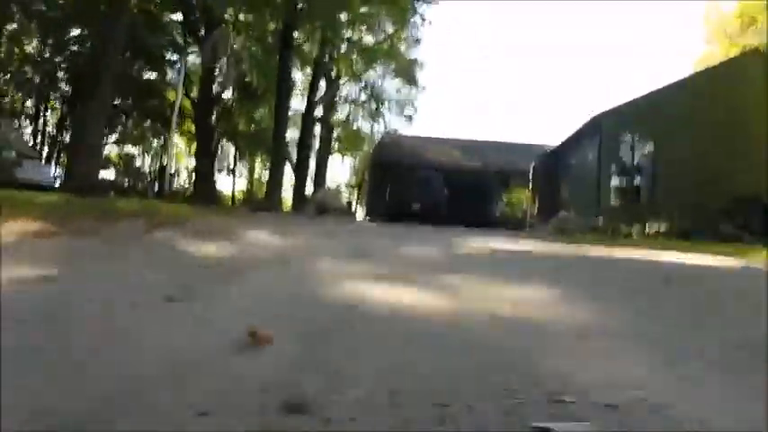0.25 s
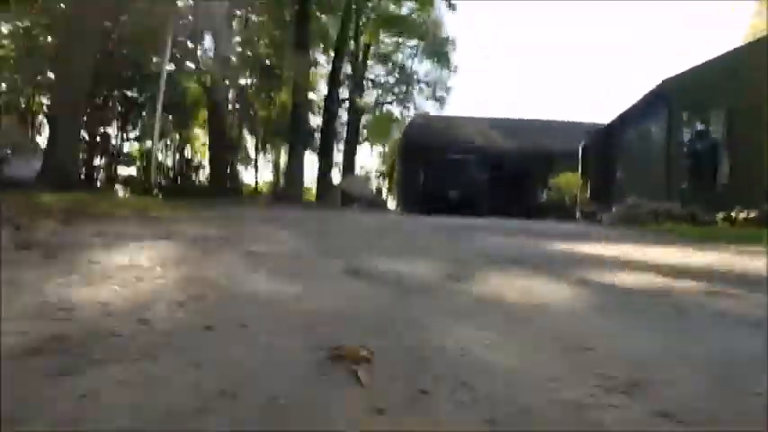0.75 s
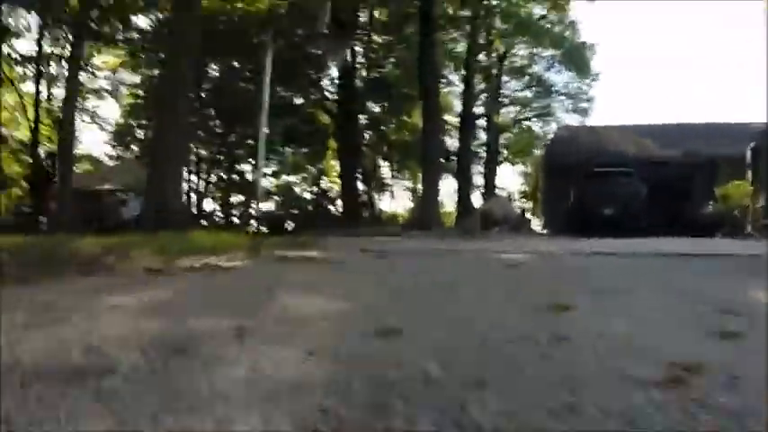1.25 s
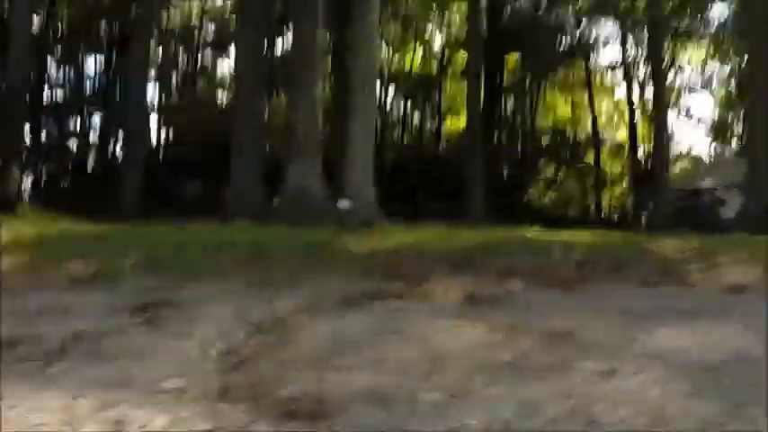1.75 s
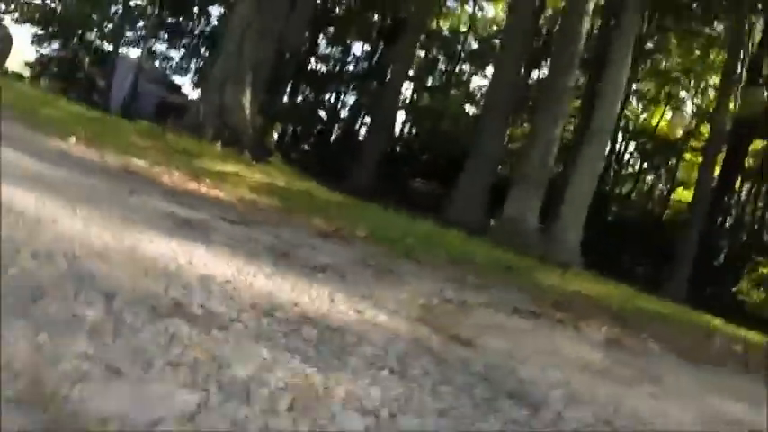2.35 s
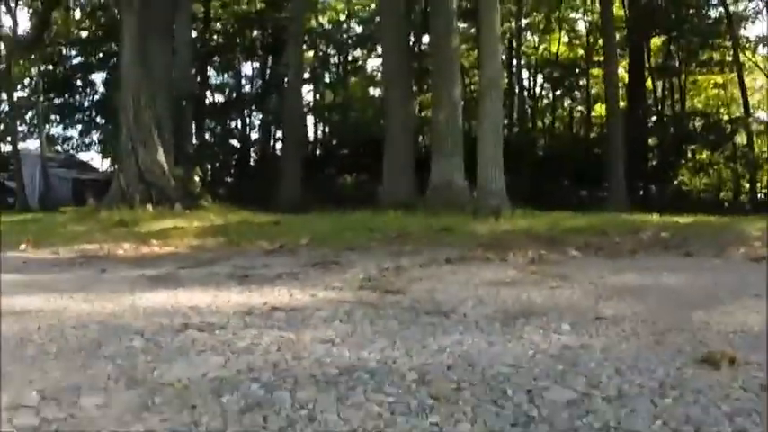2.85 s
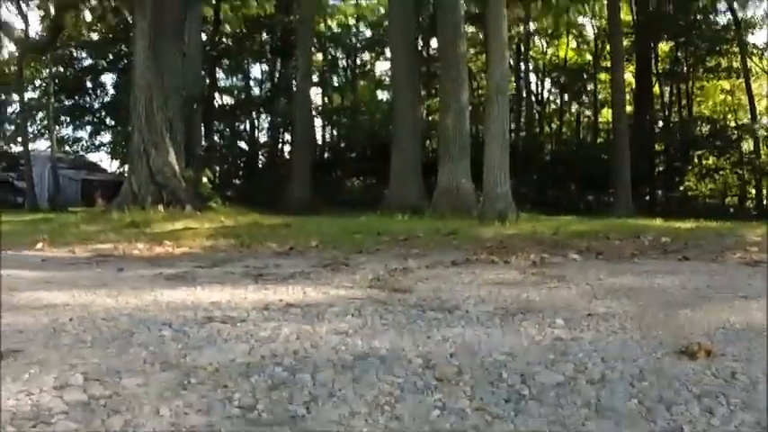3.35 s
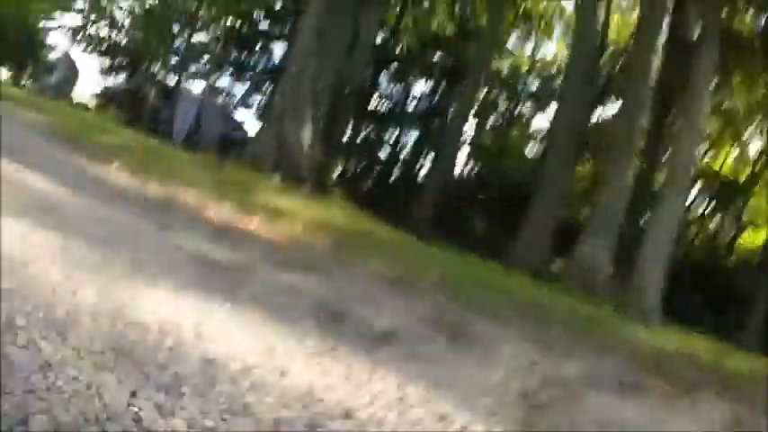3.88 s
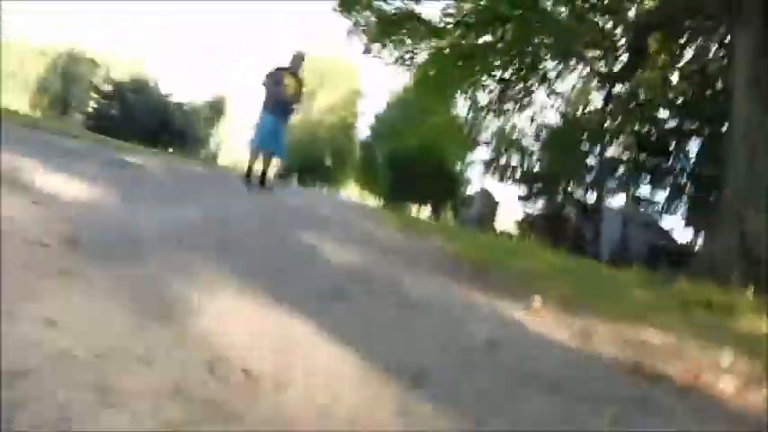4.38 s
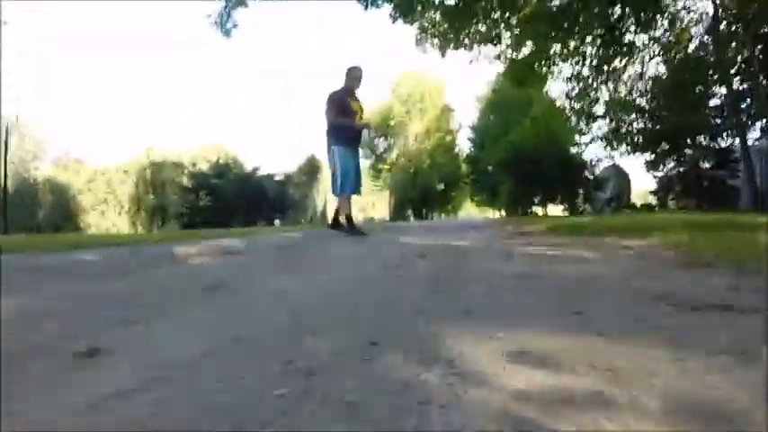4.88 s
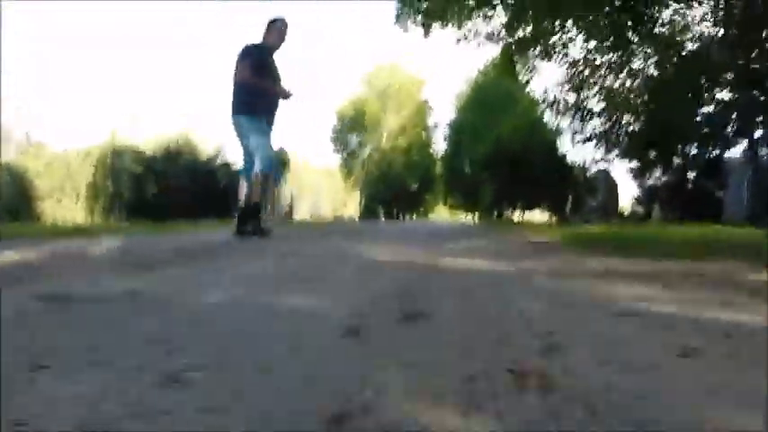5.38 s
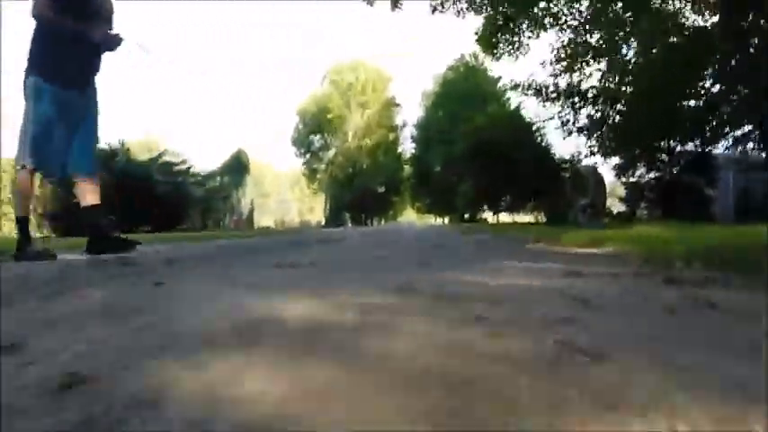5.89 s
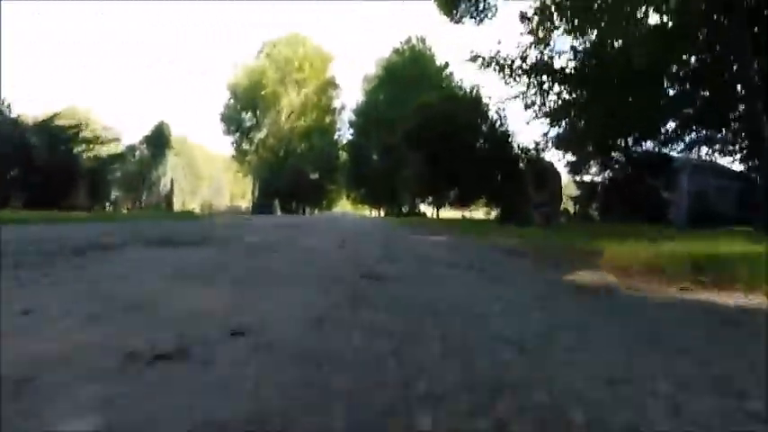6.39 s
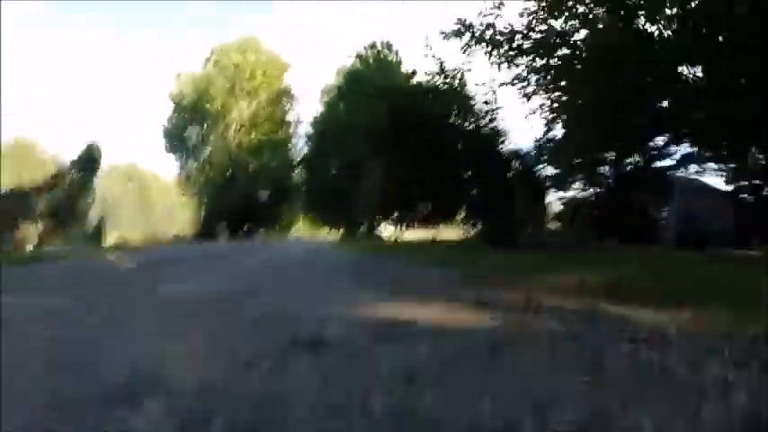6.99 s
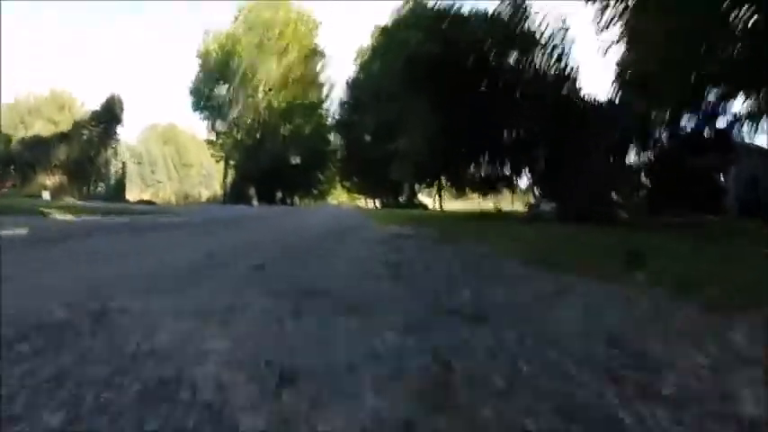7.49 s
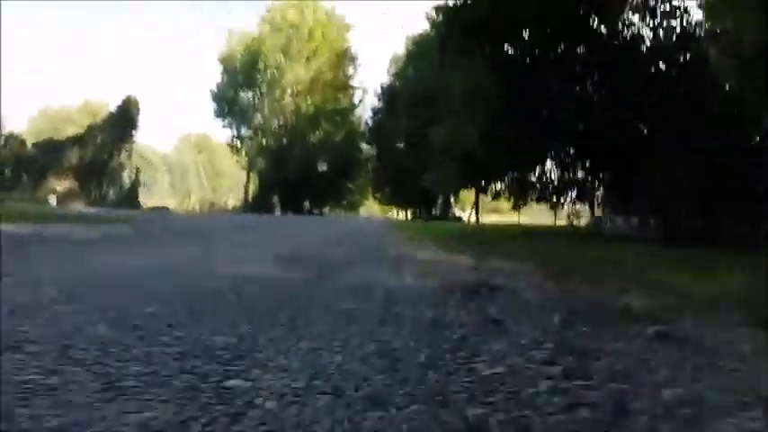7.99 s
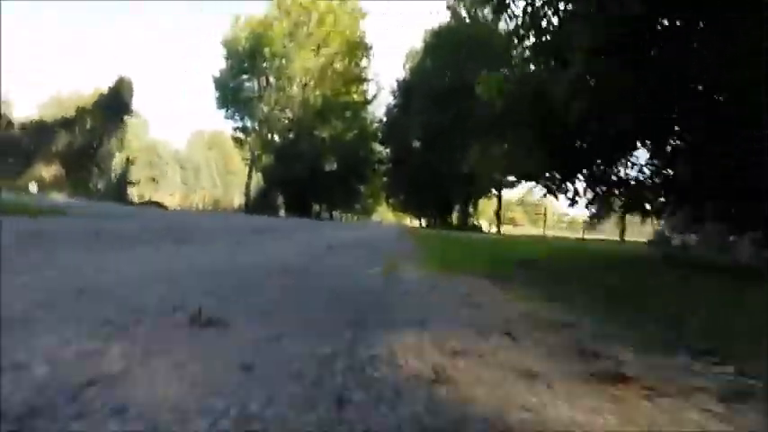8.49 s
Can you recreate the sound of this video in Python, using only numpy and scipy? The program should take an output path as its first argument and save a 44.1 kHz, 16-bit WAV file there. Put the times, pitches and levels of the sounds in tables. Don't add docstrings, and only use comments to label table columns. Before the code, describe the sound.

The microphone rides on a toy tractor, so everything is close, boxy and slightly squeezed on loud jolts. From 0 s the chassis rumbles and rattles over gravel; a dry leaf crunches near 0.2 s, with a heavy thump at 0.25 s and hollow panel knocks. Grit skids from about 0.7 to 1.9 s, with sharp ticks, thumps and plastic clacks. Around 2.3-2.8 s short gear groans interrupt a weaker rattle; from 2.9 to 3.4 s it is nearly still. A strong thump at 3.45 s and straining groans lead into a fuzzy motor hum rising at 3.6-3.8 s. It drives on from about 4 s, a thin, broken gear whine climbing, clearest near 5.1 s, then fading beneath the noise by about 7 s. Irregular rumbling, bright clacks, stone snaps and hollow knocks continue, densest around 6-7 s, until a quick cut at 8.7 s.

```python
import sys
import numpy as np
from scipy import signal
from scipy.fft import rfft, irfft, next_fast_len
from scipy.io import wavfile

SR = 44100
rng = np.random.default_rng(int(sys.argv[2]) if len(sys.argv) > 2 else 0)


def level_to_linear(level):
    exponent = np.asarray(level, float) / 20
    return 10 ** exponent


def dump_mix(stems):
    frames = np.atleast_2d(stems).T
    limited = np.clip(frames, -1, 1)
    pcm = np.round(limited * 32767).astype(np.int16)
    wavfile.write(sys.argv[1], SR, pcm)


N = 385434

# start_s, ground_roughness_db, gear_load_db, motor_effort_db
DRIVE = [(0, -14.5, -29, -44), (.5, -17.5, -33, -48.5), (.95, -14.5, -29, -59), (1.08, -21.5, -33.5, -54.5),
         (1.45, -17, -28.5, -44), (1.88, -23.5, -31, -53.5), (2.3, -21.5, -34, -56.5),
         (2.62, -25, -41, -62), (2.8, -19.5, -42.5, -64), (3.47, -22, -40.5, -61),
         (3.75, -17, -29.5, -50.5), (4.08, -18, -38.5, -52.5), (4.6, -23.5, -35, -54.5),
         (5.1, -18, -37.5, -49.5), (5.65, -20.5, -34, -50.5), (6.15, -16, -30.5, -47.5),
         (7.4, -19.5, -36.5, -56), (8.74, -17, -33, -51.5)]
# start_s, length_s, change_db
PATCHES = [(0.996, 0.02, -15), (1.903, 0.046, -6), (2.515, 0.063, 1.5), (2.894, .538, -13.5),
           (3.842, 0.033, 5.5), (3.997, 0.038, -8), (4.737, .07, -3), (5.388, 0.067, 0), (6.359, 0.22, -5),
           (6.867, .17, 2.5), (7.551, .07, 3), (7.668, 0.069, -4.5), (8.257, .06, 3), (8.567, 0.059, -1)]
# start_s, length_s, level_db
SKIDS = [(0, .62, -61), (.68, 0.072, -56), (.815, 0.043, -48), (.915, 0.04, -47), (1.06, 0.014, -54),
         (1.12, 0.74, -51), (1.55, 0.23, -47.5), (1.93, .33, -52.5), (2.3, 0.16, -78), (3.435, 0.17, -71),
         (3.65, 0.22, -63.5), (3.9, 5.9, -69.5)]
# start_s, length_s, level_db
STRAINS = [(1.28, 0.022, -28), (2.27, .02, -31), (2.36, .09, -26.5), (2.6, .02, -34), (2.67, .11, -25.5),
           (2.9, 0.41, -46), (3.45, .11, -28), (3.58, .1, -23), (3.74, 0.15, -21), (3.98, 0.09, -28),
           (4.85, 0.27, -32.5)]
# start_s, level_db
LEAF = [
    (.16, -90),
    (.167, -38),
    (.185, -43),
    (.2, -29),
    (.225, -44),
    (.235, -86.5),
]
# start_s, peak_db, pitch_hz
THUMPS = [(0.012, -10, 130), (0.251, -3, 103.4), (0.547, -13, 117), (0.952, -8, 153), (1.065, -14.5, 86.7),
          (1.264, -6, 97.6), (1.402, -5.5, 130), (1.557, -9.5, 125), (1.73, -6, 143), (1.852, -5, 135),
          (2.79, -11.5, 131), (3.451, -1, 138), (3.925, -8.5, 102.5), (4.138, -7, 143), (4.2, -6, 143),
          (4.463, -13, 108), (4.851, -23, 138), (5.4, -16, 79), (5.485, -10, 118), (5.645, -8.5, 139),
          (6.071, -9.5, 127.5), (6.189, -5.5, 144), (6.279, -7, 106), (6.543, -12, 111.5),
          (6.661, -6.5, 130), (6.778, -6.5, 85.3), (6.899, -9, 89.6), (7.229, -14.5, 138),
          (8.275, -9.5, 94), (8.505, -10.5, 85.6)]
# start_s, peak_db, brightness_db
CLACKS = [(1.0268, -16, -28), (1.115, -7.5, -30), (1.2042, -10, -29), (1.5663, -6.5, -12),
          (1.7565, -9, -15), (1.8572, -13.5, -16), (2.0172, -13, -26), (3.5861, -19, -33),
          (4.2495, -12.5, -27), (4.4862, -5.5, -27), (4.585, -5.5, -25.5), (5.3056, -4, -29),
          (5.492, -6, -26), (5.5633, -7, -22), (6.242, -9.5, -26), (6.2858, -7.5, -40), (6.3299, -4.5, -24),
          (6.8368, -5.5, -28.5), (6.9279, -7, -21), (7.012, -7.5, -24), (7.1369, -1, -34),
          (7.4902, -11, -31), (7.6113, -5.5, -22), (7.7071, -7.5, -23), (7.8097, -13, -31),
          (7.9508, -14, -23.5), (8.061, -8, -20.5), (8.2834, -19.5, -23), (8.3155, -3.5, -21),
          (8.6991, -9.5, -24)]
# start_s, peak_db, centre_hz, brightness_db
SNAPS = [(.2892, -7, 2400, -15), (1.923, -8.5, 1890, -20.5), (2.1103, -9.5, 1740, -2.5),
         (2.7835, -19, 1740, -12), (2.935, -32, 1500, -28), (3.15, -33, 2260, -20),
         (3.7753, -18, 1280, -13), (3.965, -14, 2400, -28), (4.136, -5, 2100, -20.5),
         (4.6752, -8.5, 1700, -29.5), (4.772, -19, 1720, -38), (5.1585, -11.5, 1510, -20),
         (5.4005, -3.5, 2590, -19.5), (5.645, -17.5, 2000, -28), (7.2424, -3, 1830, -20),
         (7.7493, -14.5, 1530, -30), (7.9972, -17, 1590, -19)]
# start_s, peak_db, pitch_hz
KNOCKS = [(.257, -17.5, 480), (.363, -11.5, 570), (.58, -15.5, 573), (.621, -10.5, 570),
          (1.564, -14.5, 374), (2.446, -15.5, 510), (2.797, -13.5, 370), (3.437, -21.5, 425),
          (4.055, -16, 475), (4.256, -14, 496), (4.535, -13, 600), (4.607, -15.5, 455), (4.959, -18.5, 554),
          (5.406, -13, 556), (5.501, -8, 536), (5.864, -17, 557), (6.159, -8.5, 490), (6.359, -14, 483),
          (6.76, -11.5, 513), (6.783, -13, 596), (7.073, -14, 340), (7.242, -16.5, 422),
          (7.528, -16.5, 510), (7.551, -14.5, 560), (7.995, -15.5, 516), (8.064, -18, 490),
          (8.149, -19, 553), (8.235, -16.5, 520), (8.513, -11, 543)]
# start_s, peak_db
HOOD = [(.094, -11), (.823, -10.5), (1.739, -13), (2.387, -14), (2.492, -8), (2.801, -9), (3.521, -18),
        (3.825, -19.5), (3.929, -13.5), (4.101, -13.5), (4.207, -9), (4.365, -14.5), (4.383, -8),
        (5.243, -16), (5.561, -11.5), (6.075, -16), (6.209, -13.5), (6.328, -15.5), (6.888, -7),
        (7.435, -16), (7.465, -12.5), (7.749, -18.5), (7.927, -14.5), (8.174, -14.5)]
# start_s, peak_db, pitch_hz
GRIT = [(0.0996, -41.5, 8630), (0.164, -18.5, 9950), (0.1753, -29.5, 9020), (0.2518, -38, 8800),
        (0.289, -21.5, 11300), (1.3952, -30.5, 10300), (1.4007, -24, 8750), (1.446, -39, 9010),
        (1.4574, -38.5, 9460), (1.4917, -47, 12400), (1.501, -21.5, 9500), (1.529, -30, 10800),
        (1.5969, -47, 8750), (1.6054, -34.5, 11000), (1.624, -27.5, 9200), (1.6466, -28, 10700),
        (1.6586, -35, 8560), (1.7428, -37, 8710), (1.922, -33, 11000), (2.0127, -41, 8520),
        (2.112, -36, 11100), (2.355, -49, 10500), (2.446, -42.5, 10400)]
# start_s, pitch_hz, level_db
MESH = [
    (3.85, 1450, -84),
    (3.95, 1600, -64),
    (4.1, 1920, -66),
    (4.5, 2300, -62),
    (4.8, 2430, -49),
    (5.1, 2700, -40.5),
    (5.5, 3015, -52),
    (6.5, 3285, -56),
    (6.9, 3600, -70),
]
# start_s, pitch_hz, level_db
SPIN_UP = [
    (3.5, 781, -62),
    (3.58, 860, -38),
    (3.69, 950, -27.5),
    (3.79, 950, -28),
    (3.86, 900, -58),
]
# centre_hz, width_hz, level_db
CHASSIS = [(27.2, 7.6, 3.5), (63, 27, -5), (97.4, 56, -3), (133.8, 42, -1), (157.7, 55.5, -4.5)]
SHELL = [(350, 140, 1), (538, 228, -3.5), (688, 124, 0.5), (871, 140, -2.5)]
FRAME = [(1450, 820, 0), (1695, 157, 6), (2207, 390, -7.5), (2590, 122, -5), (2830, 160, -10),
         (3474, 330, -24)]
GEARBOX = [(914, 130, -0.5), (1396, 72, 3), (1688, 130, 4.5), (2180, 92, -11.5), (4170, 200, -28.5),
           (4830, 190, -24.5)]
HOUSING = [(3620, 540, -2), (4166, 173, 6), (4856, 160, 6.5), (5710, 410, -3), (6250, 120, 4),
           (6650, 300, -5), (7310, 470, -8), (8450, 2100, -19.5), (11000, 2500, -27)]
SPRAY = [(4570, 580, -10.5), (6170, 210, -9.5), (7340, 250, -12), (8500, 570, -17.5), (9800, 2400, -25.5)]
CRUNCH = [(5500, 2200, -4.5), (9000, 3000, -8.5), (13500, 3000, -20)]
# pitch_hz, gain_db
MOUNT = [(22, -7.5), (50, 2.5), (250, 3.5), (430, 2.5), (1150, -3), (1700, 1), (3800, 2), (7600, -1),
         (9000, -3.5), (13000, -3.5), (15500, -23)]

HITCH_HZ, HOOD_HZ = 1760, 713
GEAR_TEETH = 41
OCTAVE_TOP_HZ, OCTAVE_FADE_DB_PER_HZ = 2800, 1.5
RATTLE_DB, USUAL_GROUND_DB, USUAL_LOAD_DB = -36, -19, -34
HISS_DB = -72


def evened(x):
    return x / np.sqrt(np.mean(x ** 2) + 1e-20)


def curves(table):
    s, *columns = np.transpose(table)
    return [np.interp(np.arange(N) / SR, s, column) for column in columns]


def spells(rows, rise_db_per_s, fall_db_per_s, rest_db):
    t = np.arange(N) / SR
    level_db = np.full(N, float(rest_db))
    for start_s, length_s, row_db in rows:
        before_db = rise_db_per_s * np.maximum(start_s - t, 0)
        after_db = fall_db_per_s * np.maximum(t - start_s - length_s, 0)
        level_db = np.maximum(level_db, row_db - before_db - after_db)
    return level_db


def jitter(per_s, depth_db, flutter_per_s=85, flutter=0.):
    slow, fast = rng.standard_normal((2, 1024))
    knots = np.arange(1024)
    t = np.arange(0, N + 64, 64) / SR
    wander = np.interp(t * per_s, knots, slow) + flutter * np.interp(t * flutter_per_s, knots, fast)
    return np.interp(np.arange(N) / SR, t, level_to_linear(depth_db * wander))


def ring(modes, size=2048):
    t = np.arange(size) / SR
    out = np.zeros(size)
    for k, (hz, width, db) in enumerate(modes):
        decay = width * np.exp(-np.pi * width * t)
        soft_start = 1 - np.exp(-2 * hz * t)
        out += (-1) ** k * level_to_linear(db) * decay * np.sin(2 * np.pi * hz * t) * soft_start
    return out


def shaken(modes, level_db, jolts, hits_per_s, spread_db, share, patchy_db, size=2048):
    strength = level_to_linear(spread_db * np.minimum(rng.exponential(1, N), 3))
    blows = strength * (rng.random(N) < hits_per_s / SR)
    force = rng.standard_normal(N) * (share * evened(blows) + 1 - share) * jolts
    running = np.r_[force[-size:], force]
    out = np.zeros(N)
    for k, mode in enumerate(modes):
        part = signal.oaconvolve(running, ring([mode], size))[size:size + N]
        out += (-1) ** k * part * jitter(30, patchy_db, flutter=1.0)
    return level_to_linear(level_db) * evened(out)


def footing():
    t = np.arange(N) / SR
    change_db = np.zeros(N)
    for start_s, length_s, db in PATCHES:
        end_s = start_s + length_s
        change_db += np.interp(t, [start_s - 0.029, start_s, end_s, end_s + 0.006], [0, db, db, 0])
    return change_db


def rolling():
    ground_db, load_db, effort_db = curves(DRIVE)
    patch_db = footing()
    rattle_db = RATTLE_DB + (ground_db - USUAL_GROUND_DB) + 0.22 * (load_db - USUAL_LOAD_DB) + patch_db
    strain_db = spells(STRAINS, 499, 251.5, rest_db=-52)
    jolts = jitter(30, 1.5) * jitter(90, 3.)
    mild = jolts ** 0.94
    out = shaken(CHASSIS, ground_db + patch_db - 0.5, mild, 60, 4.15, 0.38, 0.98, size=8192)
    out += shaken(SHELL, rattle_db + 3, jolts * jitter(40, 0.93), 130, 5.8, 0.45, 1.67)
    out += shaken(FRAME, load_db + 1.02 * patch_db, jolts, 260, 3.6, 0.39, 2.66)
    out += shaken(GEARBOX, strain_db, mild, 200, 3., 0.2, 5.)
    out += shaken(HOUSING, effort_db + 0.95 * patch_db + 1, mild, 300, 3.5, 0.2, 3.)
    return out + skidding(mild)


def skidding(jolts):
    skid_db = spells(SKIDS, 1492, 1497, rest_db=-80)
    spray = shaken(SPRAY, skid_db + 4, jolts, 500, 3.5, 0.3, 3.)
    pebbles = shaken(FRAME[1:4] + SPRAY[:2], skid_db + 12, 1, 60, 4., 1, 3.)
    return spray + pebbles


def struck(events, body, push_s):
    out = np.zeros(N)
    chance = rng.standard_normal((len(events), 512))
    t = np.arange(512) / SR
    for (start_s, peak_db, *colour), rough in zip(events, chance):
        push = rough * t * np.exp(-t / push_s)
        sound = signal.fftconvolve(push, body(*colour))
        part = out[round(start_s * SR):][:len(sound)]
        part += (level_to_linear(peak_db) * sound / abs(sound).max())[:len(part)]
    return out


def thump(hz):
    return ring([(hz, 30, 0), (1.31 * hz, 50, -8)], size=6000)


def clack(hz, bright_db):
    part = ring([(hz, 500, 0)])
    own = evened(signal.fftconvolve(part, part)[:len(part)])
    behind = 2.46 * evened(ring(FRAME)) + 1.03 * evened(ring(SHELL))
    return own + behind + level_to_linear(bright_db + 9.0) * evened(ring(HOUSING[1:7] + SPRAY[3:]))


def hitch(bright_db):
    return clack(HITCH_HZ, bright_db)


def knock(hz):
    return evened(ring([(hz, 110, 0)])) + 0.37 * evened(ring(SHELL))


def hood():
    return knock(HOOD_HZ)


def tick(hz):
    return ring([(hz, 1600, 0), (13500, 2500, -7), (6250, 400, 4), (4800, 400, 4)], size=512)


def impacts():
    out = struck(THUMPS, thump, 0.0025) * level_to_linear(-2.5)
    out += struck(CLACKS, hitch, 0.00032) + struck(SNAPS, clack, 0.0003)
    out += struck(KNOCKS, knock, 0.00081) + struck(HOOD, hood, 0.00062)
    return out + struck(GRIT, tick, 0.00045) * level_to_linear(4.5)


def slip(corner_hz):
    chance = rng.standard_normal(N) + 1j * rng.standard_normal(N)
    return signal.lfilter(*signal.butter(2, corner_hz, fs=SR), chance)


def mesh():
    hz, level_db = curves(MESH)
    phase = 2 * np.pi * np.cumsum(hz) / SR
    throb = (1 + np.cos(phase / GEAR_TEETH)) ** 2
    first = evened((slip(120) * np.exp(1j * phase)).real * jitter(25, 3.0))
    octave = (slip(120) * np.exp(2j * phase)).real * jitter(40, 3.7) * throb
    octave = evened(signal.oaconvolve(octave, ring(HOUSING))[:N])
    octave_db = -11.0 - OCTAVE_FADE_DB_PER_HZ * np.maximum(hz - OCTAVE_TOP_HZ, 0)
    return level_to_linear(level_db) * (first + level_to_linear(octave_db) * octave)


def spin_up():
    hz, level_db = curves(SPIN_UP)
    t = np.arange(N) / SR
    running = (t > SPIN_UP[0][0]) & (t < SPIN_UP[-1][0])
    hum = (slip(45) * np.exp(2j * np.pi * np.cumsum(hz) / SR)).real
    return running * level_to_linear(level_db) * evened(hum)


def leaf():
    return shaken(CRUNCH, curves(LEAF)[0], 1, 900, 4.4, 0.49, 1.)


def hiss():
    return level_to_linear(HISS_DB) * rng.standard_normal(N)


def scene():
    return (rolling() + impacts() + mesh() + spin_up() + leaf())[None]


def low_pass(x):
    return signal.sosfilt(signal.butter(12, 15500, fs=SR, output="sos"), x)


def record(dry):
    hz, gain_db = np.transpose(MOUNT)
    size = next_fast_len(N + SR)
    bins_hz = np.fft.rfftfreq(size, 1 / SR)
    gain = level_to_linear(np.interp(np.log(bins_hz + 1), np.log(hz), gain_db))
    coloured = irfft(rfft(dry + hiss(), size) * gain, size)[:, :N]
    coloured *= np.minimum(np.arange(N, 0, -1) / 300, 1)
    return low_pass(1.14 * np.tanh(coloured / 1.084))


dry = scene()
out = record(dry)
dump_mix(out)
```